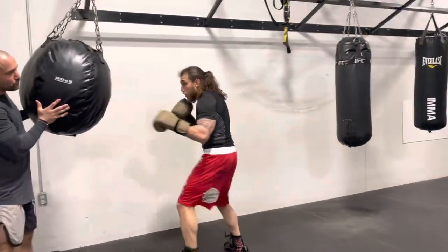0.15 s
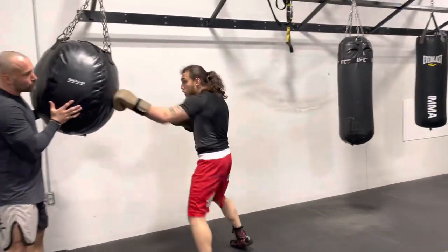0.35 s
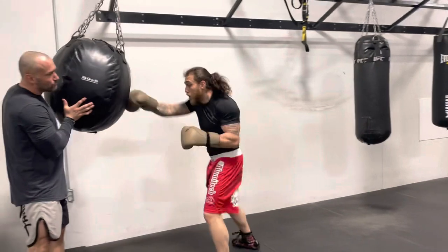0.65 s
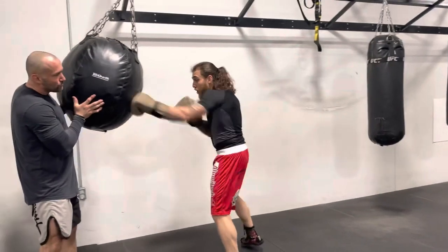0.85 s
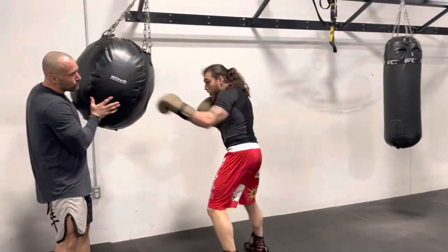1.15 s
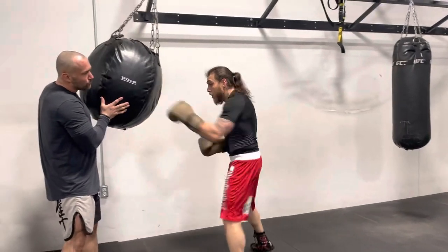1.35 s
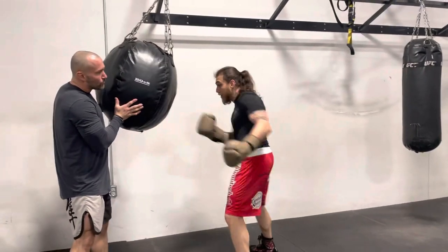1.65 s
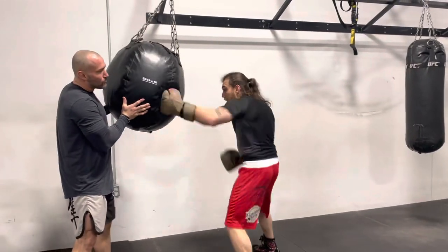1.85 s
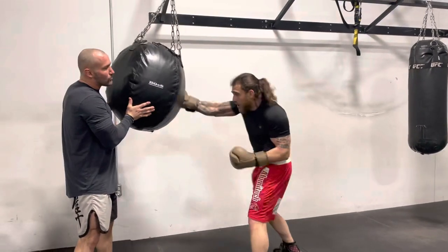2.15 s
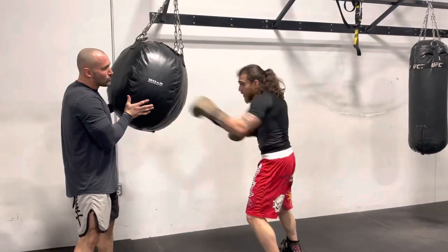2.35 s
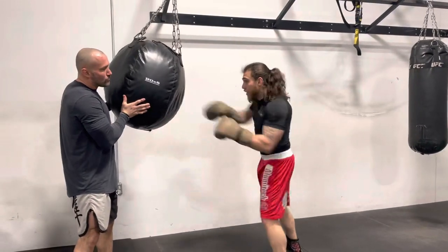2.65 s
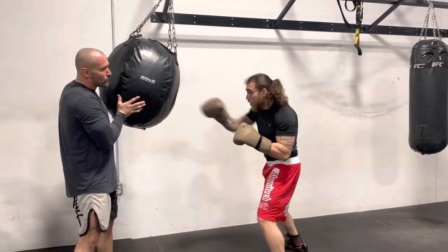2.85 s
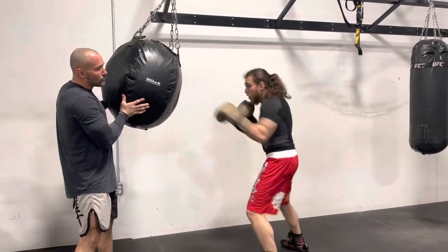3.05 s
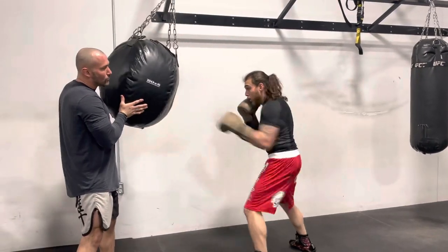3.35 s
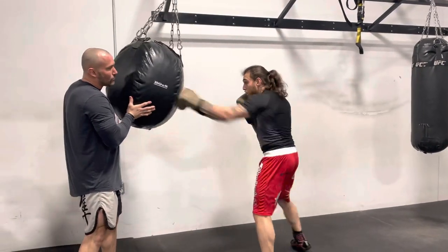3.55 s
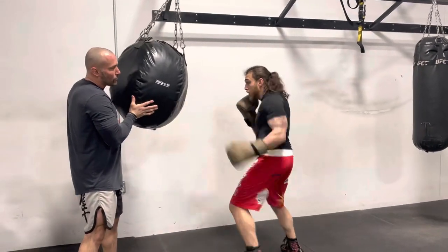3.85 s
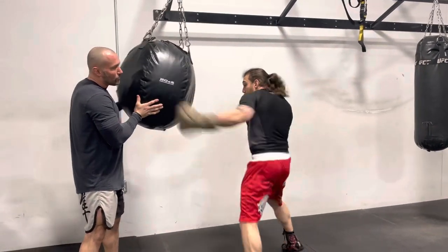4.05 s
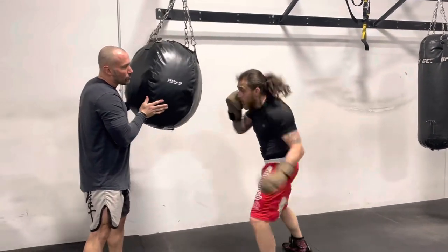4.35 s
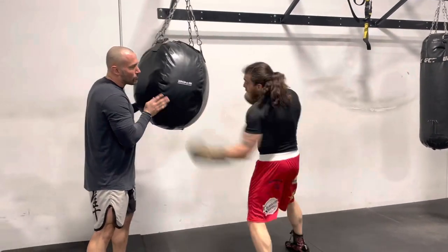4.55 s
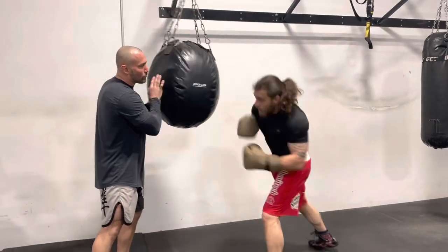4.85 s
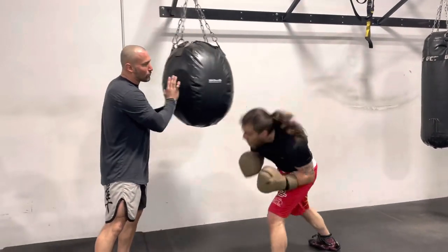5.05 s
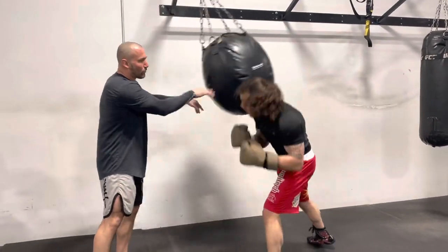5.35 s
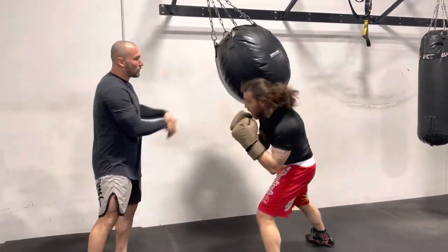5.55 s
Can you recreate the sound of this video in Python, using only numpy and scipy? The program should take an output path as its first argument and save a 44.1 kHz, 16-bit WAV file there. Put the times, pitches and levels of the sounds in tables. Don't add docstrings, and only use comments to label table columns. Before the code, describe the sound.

Gloved fists strike a hanging leather ball bag in a hard-walled gym. Each blow is a bright leather crack, a short padded thud and a low soft boom. Nine come quickly, then four slower ones, the last hardest. The chain snaps tight, rattles and pings out. Steady ventilation underneath, long room echo, phone a few metres away.

```python
import sys
import numpy as np
from scipy import signal
from scipy.fft import rfft, irfft, next_fast_len
from scipy.io import wavfile
from scipy.ndimage import uniform_filter1d

SR = 44100
rng = np.random.default_rng(int(sys.argv[2]) if len(sys.argv) > 2 else 0)


def wav_record(signal):
    frames = np.transpose(np.atleast_2d(signal))
    bounded = np.clip(frames, -1, 1)
    quanta = np.round(bounded * 32767).astype(np.int16)
    wavfile.write(sys.argv[1], SR, quanta)


def invert_db(level):
    return 10 ** (np.asarray(level, dtype=float) / 20)


N = 250929
PAD = next_fast_len(N + SR // 4)

# start in seconds, thud peak in dB, thud pitch in Hz, slap in dB, boom in dB.
BLOWS = [(0.311, -21.5, 315, -45, -36), (0.564, -16, 325, -31, -33.5), (0.846, -16.5, 303, -26.5, -34),
         (1.179, -18, 304, -33.5, -40), (1.504, -15.5, 276, -30, -40), (1.82, -15.5, 274, -31, -30.5),
         (2.119, -8, 310, -19, -20), (2.408, -15, 305, -32.5, -33), (2.701, -20.5, 348.3, -35, -47),
         (3.138, -16, 350, -31, -34), (3.581, -16, 315, -28.5, -30), (4.07, -10, 303, -21.5, -26),
         (4.577, -7.5, 328, -20, -22)]


def on_hz(table, n):
    hz, value = np.transpose(table)
    return np.interp(np.log(np.arange(n // 2 + 1) * SR / n + 1), np.log(hz), value)


def band(x, hz, width):
    edges = np.clip([hz / width, hz * width], 10, .47 * SR)
    return signal.sosfilt(signal.butter(2, edges, "band", fs=SR, output="sos"), x)


def ring(modes, seconds, phases):
    t = np.arange(int(seconds * SR)) / SR
    out = np.zeros(len(t))
    for (hz, db, t60), phase in zip(modes, phases):
        out += invert_db(db - 60 * t / t60) * np.sin(2 * np.pi * hz * t + phase)
    return out


def add(out, start, x, db):
    i = int(start * SR)
    out[i:i + len(x)] += (invert_db(db) / np.max(np.abs(x)) * x)[:N - i]


def walk(rate):
    hold = int(SR / rate)
    steps = np.repeat(rng.standard_normal(N // hold + 1), hold)
    return 1.63 * uniform_filter1d(uniform_filter1d(steps, hold), hold)[:N]


def ventilation():
    # pitch in Hz, level in dB per Hz.
    air_colour = [(20, -47), (35, -17), (60, -2), (120, -5), (200, -10.5), (350, -11.5), (700, -14.5),
                  (1500, -22), (3000, -27.5), (5000, -37.5), (7500, -49), (11000, -55.5), (14000, -54.5),
                  (16500, -67)]
    noise = rfft(rng.standard_normal((2, PAD))) * invert_db(on_hz(air_colour, PAD))
    octave = np.log2(np.arange(PAD // 2 + 1) * SR / PAD + 1)
    swell = 0.17 * walk(1.94)
    out = np.zeros((2, N))
    for k in range(4, 16):
        share = np.clip(1 - abs(octave - k), 0, 1)
        out += irfft(noise * share, PAD)[:, :N] * invert_db(swell + 1.2 * walk(6))
    return out * invert_db(-34.5) / out.std()


def scuffs():
    # start in seconds, length in
    # seconds, peak in dB, centre in Hz.
    slips = [
        (.0, 0.049, -41, 8200),
        (5.198, 0.087, -49, 9030),
        (5.335, 0.09, -32, 760),
        (3.146, 0.02, -21, 486),
        (3.199, 0.066, -30, 510),
        (3.583, 0.035, -23, 753),
        (4.081, 0.056, -24, 470),
    ]
    out = np.zeros(N)
    for start, length, db, hz in slips:
        n = int(length * SR)
        grains = rng.standard_normal(SR // 4)[:n] ** 3
        add(out, start, band(grains, hz, 1.16 + hz / 25000) * np.hanning(n) ** .5, db)
    return out


def blows():
    # multiple of the thud pitch, level in dB, seconds to fall 60 dB.
    thud_modes = [(1.0, -1, 0.029), (1.9, -1, 0.027), (1.45, -4, 0.024), (3.1, -1, 0.013),
                  (4.4, -11.5, 0.024), (.55, -10.5, 0.039)]
    # pitch in Hz, level in dB, seconds to fall 60 dB.
    boom_modes = [(54, -5, 0.28), (62.2, -6, 0.22), (80, -23, 0.45), (119.3, -16.5, 0.13)]
    soft_tilt, hard_db = 0.24, -5
    near, far = np.zeros(N), np.zeros(N)
    t = np.arange(SR // 2) / SR
    click = (t == 0).astype(float)
    for start, db, hz, slap_db, boom_db in BLOWS:
        noise, chance = rng.standard_normal(len(t)), rng.uniform(-0.9, 1, 16)
        modes = []
        for (multiple, level, t60), detune in zip(thud_modes, chance):
            softness = soft_tilt * (db - hard_db) * np.log2(max(multiple, 1))
            modes.append((hz * multiple * (1 + 0.051 * detune), level + softness, t60))
        thud = ring(modes, .5, chance[6:]) * (1 - np.exp(-t / 0.0021))
        thud *= 1 + 0.21 * band(noise, 317.0, 1.54) / 0.12
        slap = band(noise[::-1], 1350.0, 1.88) * invert_db(-60 * t / 0.05) * (1 - np.exp(-t / 0.00093))
        boom = ring(boom_modes, .5, .5 * chance[12:]) * (1 - np.exp(-(t / 0.013) ** 2))
        add(near, start + 0.00088, thud, db - 0.4)
        add(near, start, slap, slap_db + 7)
        add(near, start + 0.0073, boom, boom_db + 5)
        add(far, start, band(click, 1.2 * hz, 2.51), db + 4)
        add(far, start, band(click, 1355.0, 2.77), slap_db + 15.5)
        add(far, start, boom, boom_db)
    return near, far


def cracks():
    # start in seconds, peak in dB, dullness in dB, turned to the hall in dB.
    touches = [(0.3132, -28, 13, 2.5), (0.3186, -15.5, -37.5, -1), (0.559, -21.5, -5, -5),
               (0.567, -16, -31, 2), (0.837, -19.5, -5.5, -4), (0.8471, -25, -20, 4),
               (1.177, -21.5, -9.5, 0.1), (1.215, -28, 14, 1), (1.504, -18.5, -0.5, -18),
               (1.5113, -26, -2, 0), (1.8188, -18.5, -3, 1.5), (1.8447, -28, 11, -1), (2.119, -16, -21, -6),
               (2.123, -13, -14, 6), (2.4098, -12, -4.5, -3), (2.702, -21.5, -12, -2), (3.1354, -20, -5, 3),
               (3.5782, -23.5, -14, 13.5), (3.5813, -24, -21, 4), (4.0712, -10, -18, -2),
               (4.0803, -18, -23, 4), (4.577, -11.5, -12, 6.5), (4.588, -21, -18, 8)]
    near, far = np.zeros(N), np.zeros(N)
    t = np.arange(SR // 20) / SR
    fade = invert_db(-60 * t / 0.0032) + 0.13 * invert_db(-60 * t / 0.051)
    fade *= 1 - np.exp(-t / 0.00013)
    for start, db, low_db, hall_db in touches:
        both = np.array([rng.standard_normal(len(t)) * fade, t == 0])
        colour = invert_db(low_db + 4.5) * band(both, 3860.0, 1.37)
        colour += invert_db(-0.5) * band(both, 6910.0, 1.53)
        colour += invert_db(-5.5) * band(both, 11800.0, 1.47)
        add(near, start, colour[0], db + 1)
        add(far, start, colour[1], db + 3.5 + hall_db)
    return near, far


def hall(x):
    # pitch in Hz, seconds to fall 60 dB, level in dB.
    hall_bands = [(53, 2.7, -7.5), (122.7, 2.76, -3), (271, 1.22, -2), (580, 1.73, -9.5),
                  (1500, 2.55, -4.5), (2930, 1.9, -7.5), (5600, 0.84, -8), (11300, 0.58, -13)]
    # delay in seconds, dB over the tail.
    wall_echoes = [(.012, 1), (.03, 4), (.07, 3), (.14, 1.5)]
    t = np.arange(int(1.6 * SR)) / SR
    swell = np.ones(len(t))
    for delay, db in wall_echoes:
        swell += (invert_db(db) - 1) * np.exp(-((t - delay) / (0.0024 + 0.38 * delay)) ** 2)
    shape = (1 - np.exp(-(t / 0.0049) ** 2)) * swell
    tails = np.zeros((2, len(t)))
    for hz, t60, db in hall_bands:
        tails += band(rng.standard_normal((2, len(t))), hz, 1.413) * invert_db(db - 60 * t / t60)
    return invert_db(-31) * signal.fftconvolve(x[None], tails * shape, axes=1)[:, :N]


def jolts():
    # start in seconds, peak in dB, pitch in Hz.
    bumps = [
        (0.409, -29, 139),
        (2.335, -30, 300),
        (2.361, -22.5, 58),
        (4.728, -14.5, 277),
        (4.76, -16.5, 220),
        (4.82, -28, 192),
        (4.88, -26.5, 62.4),
    ]
    after_s, after_db, after_pitch = .069, -9, 0.78
    far_echoes = [(start + after_s, db + after_db, hz * after_pitch)
               for start, db, hz, *_ in BLOWS if db > -17.5]
    near, far = np.zeros(N), np.zeros(N)
    t = np.arange(SR // 5) / SR
    click = (t == 0).astype(float)
    for start, db, hz in far_echoes + bumps:
        fade = invert_db(-60 * t / (0.038 + 11.0 / hz)) * (1 - np.exp(-t / 0.0054))
        add(near, start, band(rng.standard_normal(len(t)), hz, 1.78) * fade, db - 2)
        add(far, start, band(click, hz, 1.6), db - 3)
    return near, far


def knocks():
    # start in seconds, peak in dB, then dB shares of big rings, middle and smallest links
    rattle = [(4.637 + k * 0.011, -33, -24, 4.4, 27) for k in range(7)]
    snap = [(4.726 + k * 0.0087, -21.5, -16, -12, 12) for k in range(2)]
    gap_s, slowing = .017, 1.17
    late = np.cumsum(gap_s * slowing ** np.arange(11)) - gap_s
    settle = [(4.748 + d, -28 - 100 * d, 4 + 60 * d, 9, -9) for d in late]
    return rattle + snap + settle


def chain():
    # pitch in Hz, level in dB.
    link_modes = [(1850, -4.5), (1960, -3), (2140, -2.5), (2450, -7.5), (4250, -12), (4750, -9),
                  (5300, -11), (6100, -19.5), (6900, -15), (9150, -1), (9800, -20), (10700, -11),
                  (11300, -6), (13550, -27)]
    # start in seconds, peak in dB.
    pings = [
        (4.93, -30.5),
        (4.968, -36),
        (4.995, -35),
        (5.045, -36.5),
        (5.08, -44),
        (5.129, -54),
        (5.19, -52),
    ]
    # pitch in Hz, level in dB, seconds to fall 60 dB.
    swivel_modes = [(4460, -6, 0.056), (2420, -12, .05), (1900, -12, 0.035)]
    out = np.zeros(N)
    for start, db, big_db, mid_db, small_db in knocks():
        detune, uneven, phase = rng.standard_normal((3, 3 * len(link_modes)))
        modes = []
        for (hz, level), j, g in zip(link_modes * 3, detune, uneven):
            spread = .025 if 3000 <= hz < 13000 else .008
            share = big_db * (hz < 3000) + mid_db * (3000 < hz < 8000) + small_db * (hz > 13000)
            modes.append((hz * (1 + spread * j), level + 3 * g + share, 58 / hz + 0.013))
        contacts = rng.standard_normal(1200) ** 3 * np.hanning(1200)
        body = ring(modes, .12, 9 * phase)
        body[0] += 9.0
        add(out, start - .012, band(np.convolve(body, contacts), 3550.0, 4.8), db + 7)
    rise = np.minimum(np.arange(int(.3 * SR)) / 150, 1)
    for start, db in pings:
        add(out, start, ring(swivel_modes, .3, rng.uniform(0, 3.9, 3)) * rise, db)
    return out


def scene():
    # pitch in Hz, likeness from 0 to 1.
    hall_like = [(60, 0.99), (130, 0.97), (290, 0.75), (640, 0.19), (1400, 0.13), (3100, 0.31),
                 (5000, 0.48), (6500, 0.91), (8000, 1), (16000, 0.62)]
    # pitch in Hz, likeness from 0 to 1.
    near_like = [(500, 1), (6000, .9), (8400, .7), (10500, .9), (14500, .7)]
    air, shoes = ventilation(), scuffs()
    blow, blow_far = blows()
    crack, crack_far = cracks()
    jolt, jolt_far = jolts()
    steel = chain()
    into_hall = blow_far + crack_far + jolt_far + invert_db(-0.5) * steel + invert_db(2) * shoes
    diffuse = rfft(hall(into_hall) + air, PAD)
    direct = rfft(blow + crack + jolt + steel + shoes, PAD)
    like = np.clip(on_hz(hall_like, PAD), 0, 1)
    scatter = rng.standard_normal(200) * np.exp(-np.arange(200) / 14.0)
    scatter /= np.linalg.norm(scatter)
    close = np.minimum(like ** 0.33, on_hz(near_like, PAD))
    path = close + np.sqrt(1 - close ** 2) * rfft(scatter, PAD)
    path /= np.abs(path) ** 0.82
    first = direct + diffuse[0]
    second = direct * path + like * diffuse[0] + np.sqrt(1 - like ** 2) * diffuse[1]
    return irfft([first, second], PAD)[:, :N]


def roll_off(x):
    return signal.sosfilt(signal.butter(12, 16530, fs=SR, output="sos"), x)


def record(dry):
    # pitch in Hz, left ahead of right in radians.
    port_lead = [(100, 0), (1200, .2), (5000, .2), (6400, -.2), (7700, -2.8), (9200, -3.5), (10400, -6),
                 (12900, -6.55), (13800, -9.0), (15300, -9.7), (16500, -10.2)]
    # pitch in Hz, left minus right in dB.
    port_tilt = [(60, 0), (110, 1), (200, 0), (380, 0), (700, 1.5), (1290, 0.5), (2380, 0), (4400, 2.5),
                 (8120, -1.5), (15000, 1.5)]
    # pitch in Hz, level in dB.
    port_tone = [(100, 1), (12000, -1.5), (14000, -7.5), (15200, -12), (16500, -30)]
    half = np.exp(.5j * on_hz(port_lead, PAD)) * invert_db(on_hz(port_tilt, PAD) / 2)
    heard = rfft(dry, PAD) * invert_db(on_hz(port_tone, PAD)) * [half, 1 / half]
    heard = irfft(heard, PAD)[:, :N]
    return roll_off(np.tanh(1.234 * heard) / 1.165)


dry = scene()
out = record(dry)
wav_record(out)
```